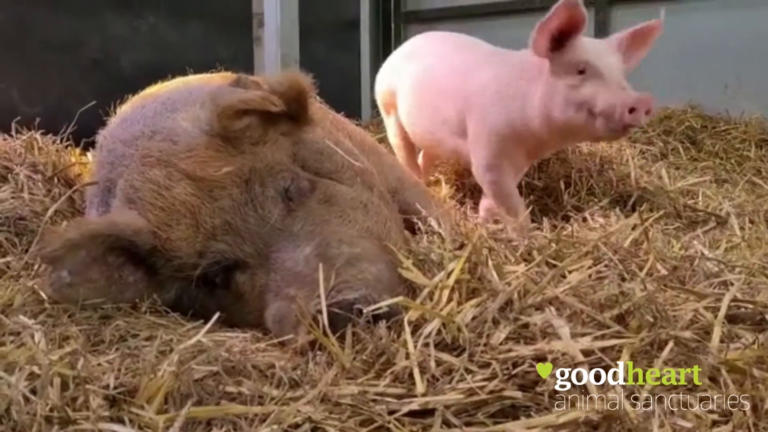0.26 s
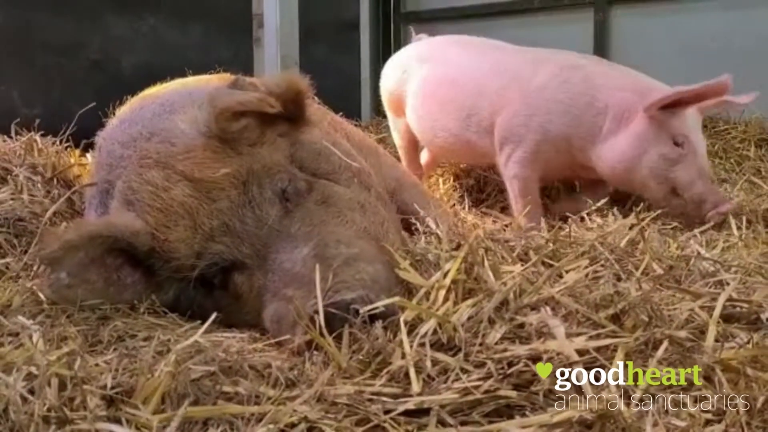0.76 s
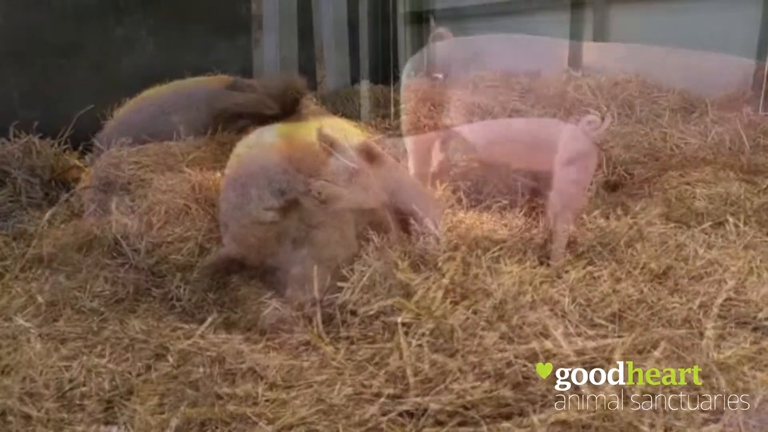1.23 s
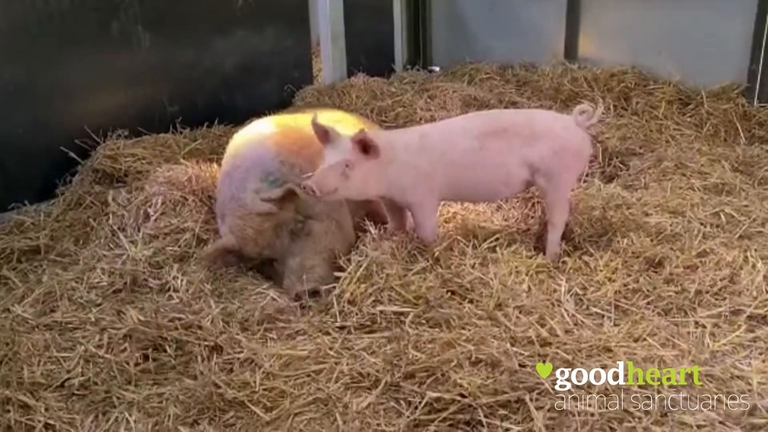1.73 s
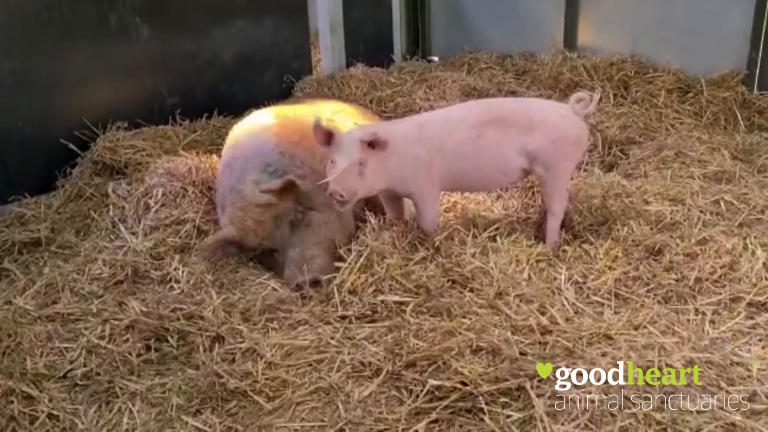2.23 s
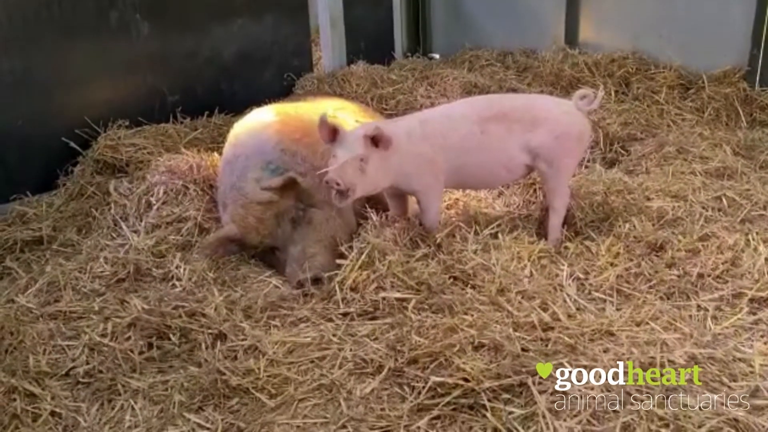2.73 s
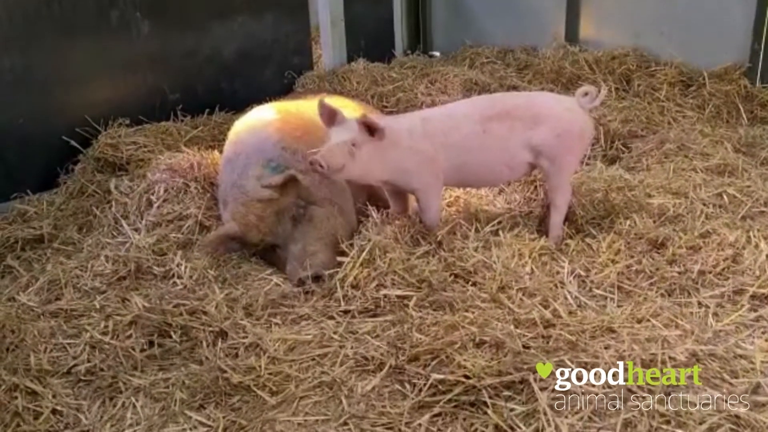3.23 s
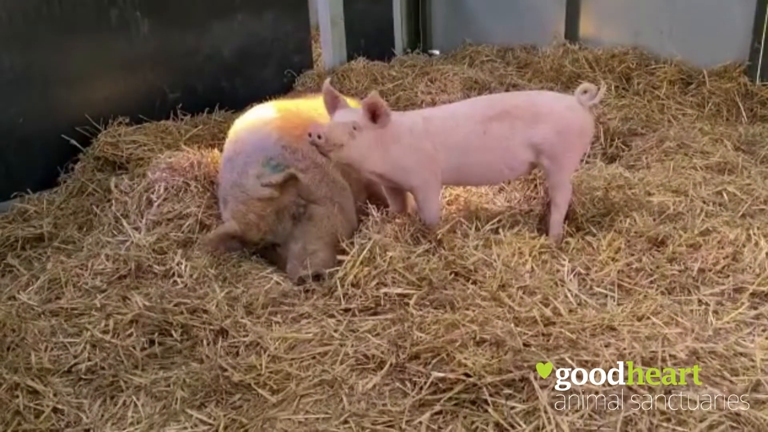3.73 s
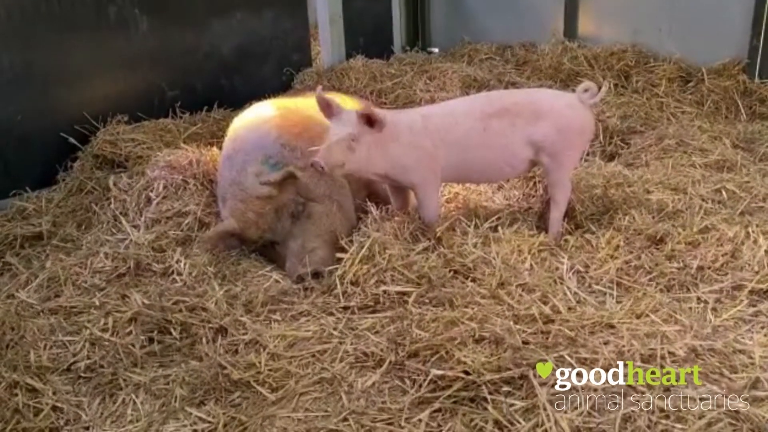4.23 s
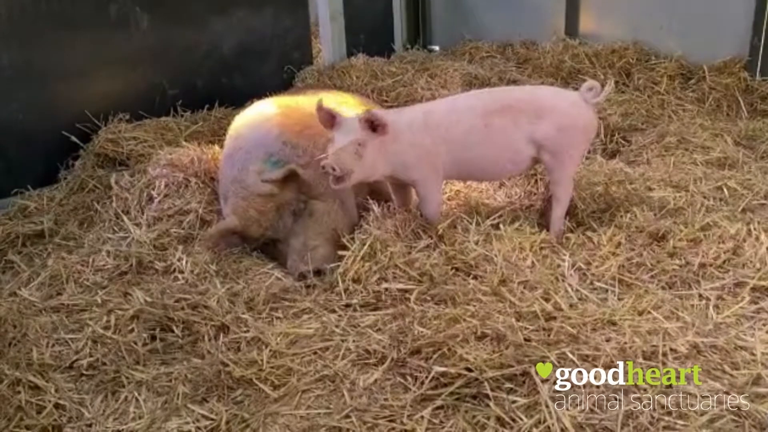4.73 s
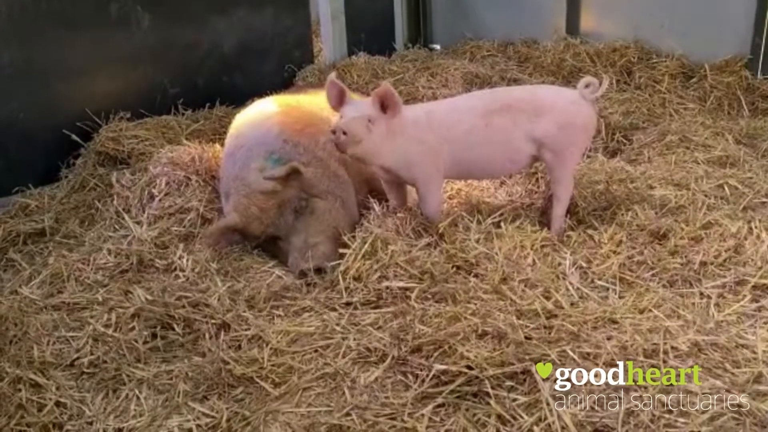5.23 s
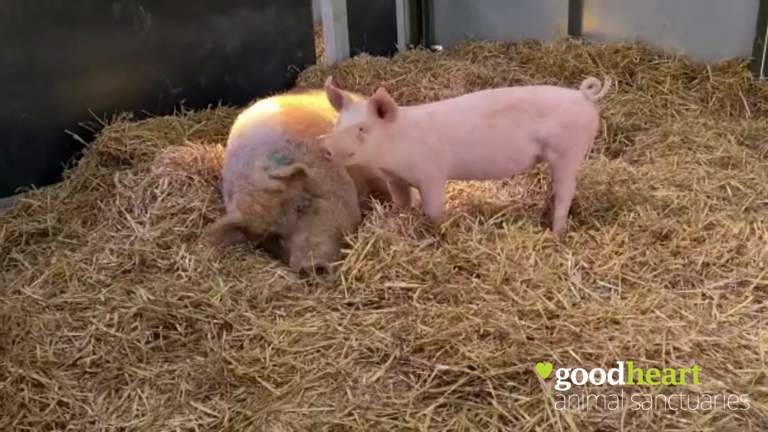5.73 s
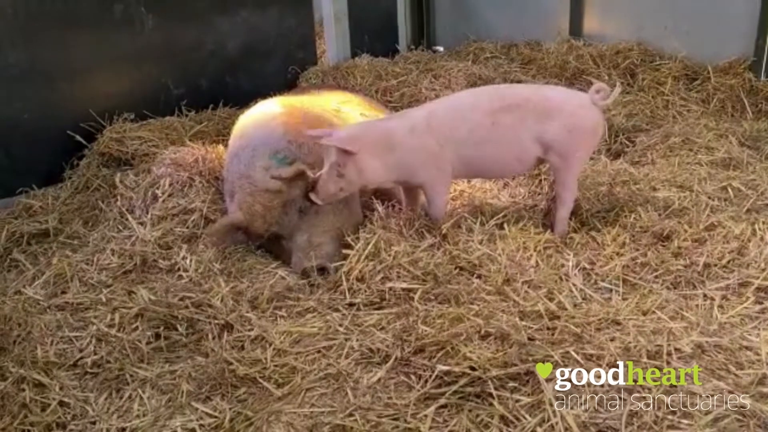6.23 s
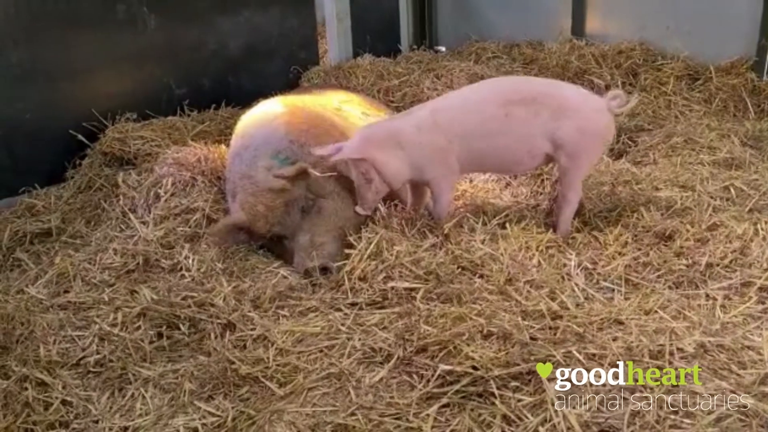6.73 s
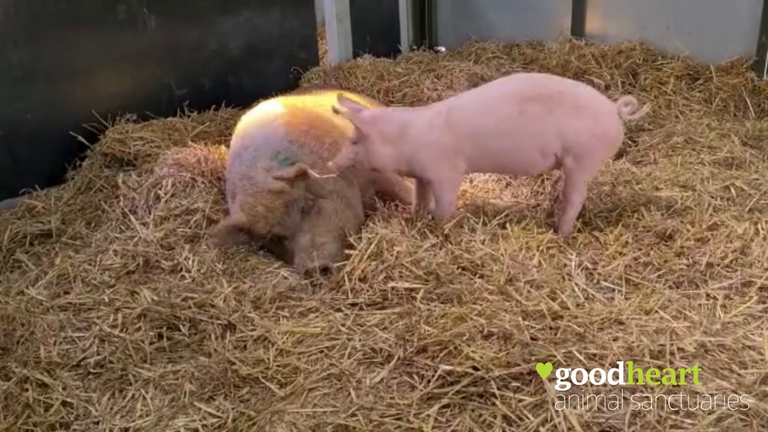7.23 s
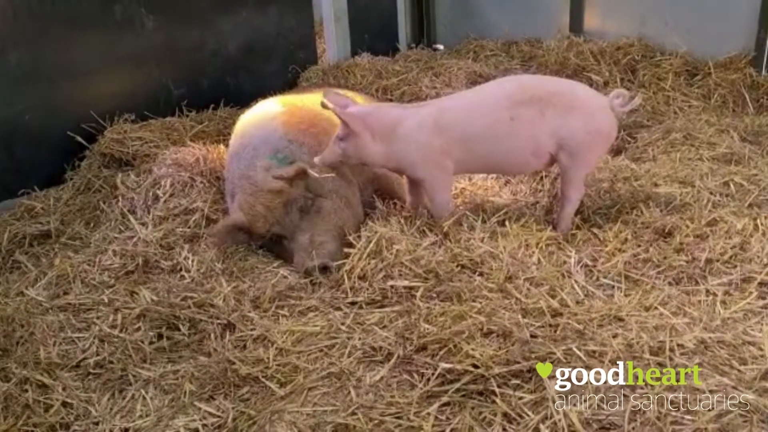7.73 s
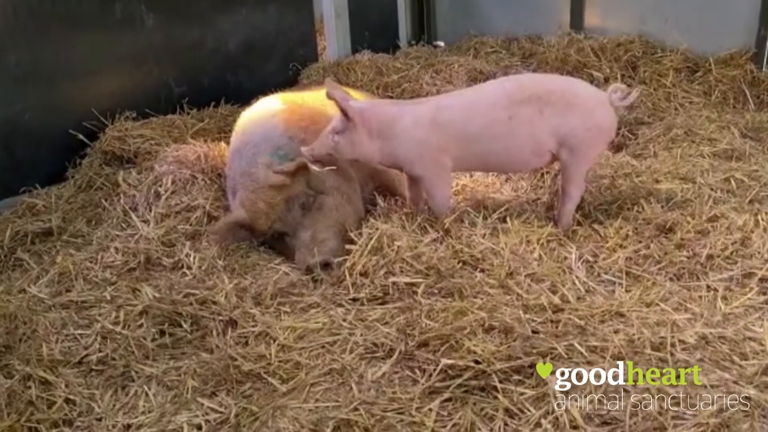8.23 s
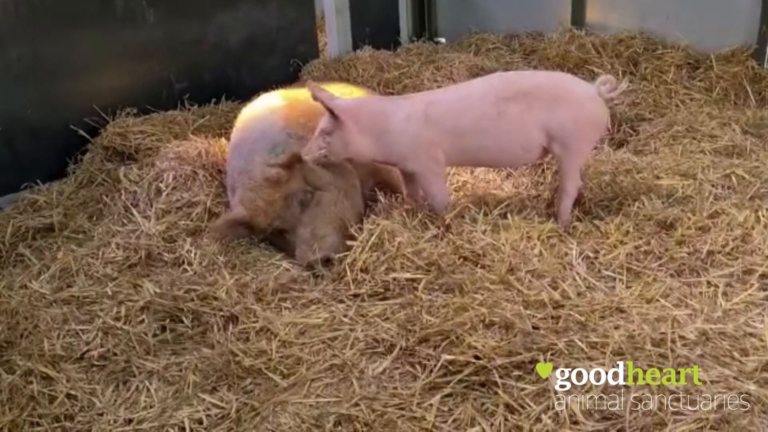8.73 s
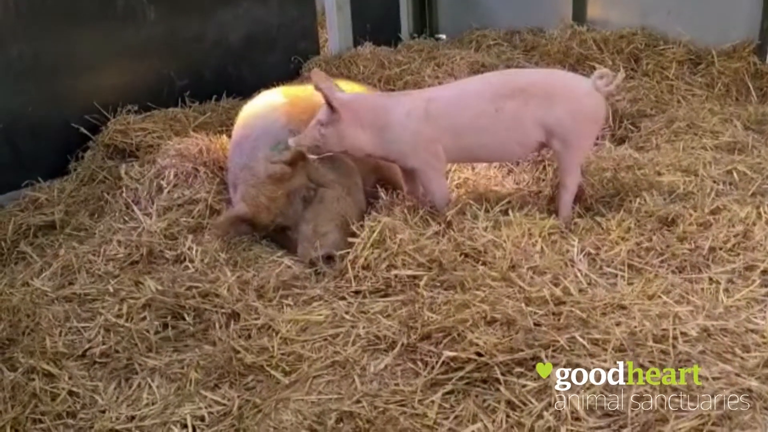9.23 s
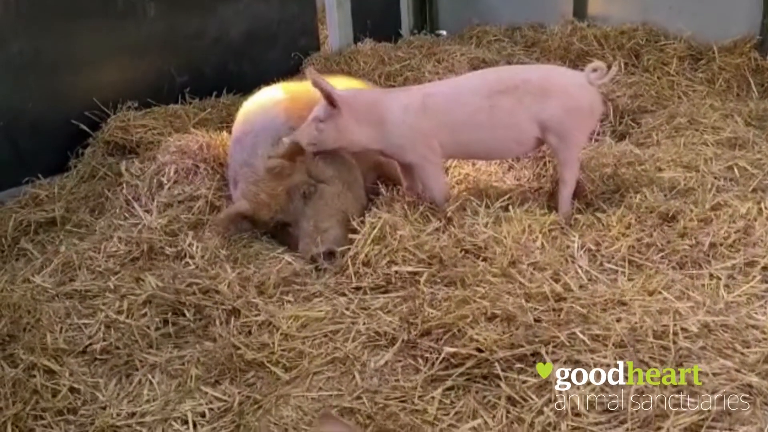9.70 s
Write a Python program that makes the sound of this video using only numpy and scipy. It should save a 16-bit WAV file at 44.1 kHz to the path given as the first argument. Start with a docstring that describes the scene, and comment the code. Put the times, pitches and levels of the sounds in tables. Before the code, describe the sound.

A piglet near the microphone roots in dry straw, its grunts made of a few slow, throaty pulses, with small sniffs and snapping stalks. Behind it a large dozing pig lets out low, raspy, nasal groans. A calmer spell is broken by a latch click and a sudden booming gate rattle, by far the loudest event. Afterwards groaning, grunting and rustling resume in the moderately reverberant barn, over a soft bass rumble.

```python
"""Barn air and rustling straw come first, then a big dozing pig's faint nasal whistle and low groans.
A piglet close by grunts in short rattles, sniffs and roots: slow vocal-fold flaps ring its airway.
The groans are a sine hum with rasp and whistle; the straw is filtered noise with tiny clicks.
Halfway through, a latch clicks and a gate bangs: its panel rings in decaying modes round the barn,
while noise bursts form its rattle."""
import sys
import numpy as np
from scipy import signal
from scipy.fft import rfft, irfft, next_fast_len
from scipy.io import wavfile

SR = 44100
rng = np.random.default_rng(int(sys.argv[2]) if len(sys.argv) > 2 else 0)


def wrap_up_sound(samples):
    """Save the sound to the file named by the first command line argument, as 16-bit audio."""
    columns = np.atleast_2d(samples).T
    # keep every value between -1 and 1, then stretch to whole-number steps
    tamed = np.clip(columns, -1, 1)
    steps = np.round(tamed * 32767).astype(np.int16)
    wavfile.write(sys.argv[1], SR, steps)


N = 439236
TIME = np.arange(N) / SR  # s

# spectrum of the barn air: (frequency [Hz], relative level [dB])
AIR_SPECTRUM = [(25, -21), (64, 9), (97, -3), (135, -4.5), (226, -8.5), (320, -7.5), (961, -23.5),
                (1610, -27.5), (2000, -25), (2600, -31.5), (4400, -120)]
AIR_DB = -51.5

# stirring of the straw, which sets its crisp sizzle: (time [s], level before trims [dB])
STRAW_STIR = [(0.0, -67), (0.47, -53), (0.7, -67), (1.3, -50.5), (1.41, -69), (1.5, -50.5), (1.68, -48),
              (2.0, -61.5), (2.28, -54), (2.55, -77.5), (3.2, -72.5), (3.5, -64.5), (4.2, -77), (6.18, -70),
              (6.45, -80), (7.42, -74), (7.65, -61), (7.95, -54), (8.12, -72), (8.75, -63), (9.15, -58.5),
              (9.42, -48), (9.55, -58), (9.75, -36), (9.96, -73)]
# shoves through the straw: (time [s], half width [s], level before trims [dB])
STRAW_SHOVES = [(0.887, 0.076, -51), (1.949, 0.021, -41.5), (7.526, 0.022, -53), (7.677, 0.057, -38.5),
                (8.46, 0.056, -49.5), (8.557, 0.049, -40.5), (8.844, 0.022, -51), (8.995, 0.037, -47),
                (9.265, 0.045, -35), (9.742, 0.024, -46)]
# spectra of sliding and of crisp stalks: (frequency [Hz], relative level [dB])
RUSTLE_SPECTRUM = [(700, -11.5), (1500, -5), (2300, -4), (3000, 1), (4500, 0.5), (6400, 4.5), (7400, -2.5),
                   (8500, -26), (11000, -16.5)]
SIZZLE_SPECTRUM = [(5000, -24), (7500, 0.5), (9000, -4.5), (10500, 2), (12200, 5.5), (14000, 2.5),
                   (16000, 2.5)]
# the softer rustle grows more slowly than the sizzle: levels at rest, and dB of rustle per dB of sizzle
REST_SIZZLE_DB, REST_RUSTLE_DB, RUSTLE_GROWTH = -72.5, -62, 0.38

# groans of the big pig: (time [s], length [s], time to the fullest point [s], settled pitch [Hz],
#   hum level [dB], rasp level [dB], nasal whistle level [dB], final slump [0-1])
GROANS = [(0.286, 1.21, 0.13, 112.2, -89, -88, -64, 0.02),
          (1.253, .77, 0.36, 105.3, -45.5, -47.5, -58.5, 0.01),
          (5.379, 1.113, 0.42, 95.55, -47, -52, -54.5, 0.99),
          (6.84, 0.865, 0.34, 103.4, -49.5, -47.5, -56, 0.03)]
# spectrum of the groan's rasp: (frequency [Hz], relative level [dB])
RASP_SPECTRUM = [(110, 10), (190, 5.5), (290, 5.5), (450, -2.5), (650, -8.5), (1000, -36), (2000, -63)]
# each groan starts at one pitch and sags; it swells to its fullest point and eases off
GROAN_START_HZ, SAG_S = 115.3, 0.38
GROAN_ATTACK_S, GROAN_RELEASE_S = 0.053, 0.075
# levels at both ends relative to the fullest point; the whistle follows with this share of them
SWELL_DB, EASE_DB, WHISTLE_SHARE = -14.5, -3.5, 0.88
# a slump is a last push of air, then slack folds and a falling pitch (times before the groan's end)
PUSH_BEFORE_S, PUSH_WIDTH_S, PUSH_DB = 0.23, 0.083, 9
SLACK_BEFORE_S, SLACK_S, SLACK_HZ = 0.14, 0.087, 30.94
SLACK_WHISTLE_DB = -32  # the whistle fades as the folds go slack

# piglet grunts: (time [s], number of flaps [count], flap rate [Hz], fullest moment [flaps],
#   swell [dB/flap], fade [dB/flap], brightening [dB/flap per factor e above the throat resonance],
#   extra level of every second flap [dB], leak relative to voice [dB], belly level [dB],
#   chest level [dB], throat level [dB], jaw level [dB], mouth level [dB], nose level [dB],
#   mouth frequency [Hz], mouth glide [octaves/flap])
GRUNTS = [(0.848, 5, 39.28, 1.5, 7, 4, 1.5, 1, -4, -42, -38, -48, -61, -58, -66, 1730, -0.062),
          (1.139, 2, 40, 1.5, 0, -2, -6, 0.5, -2, -46, -45.5, -54, -52, -55, -53.5, 1550, 0),
          (1.186, 3, 46.1, 2, -0.5, 0, -1.5, 2, -4, -40.5, -43.5, -48.5, -46.5, -37.5, -50.5, 1810, -0.035),
          (1.608, 3, 39.04, -0.5, 20.5, -0.5, -1, 1.5, -5.5, -44, -37.5, -37, -41.5, -40.5, -35, 1836, 0),
          (6.26, 1, 47.3, 12, 0, 0, 0, 0, -3, -40, -43, -45.5, -57, -63, -46.5, 1440, 0),
          (6.463, 2, 49.1, 1, 1, 0, 2, 0, -3, -46, -40.5, -46.5, -75, -72, -57, 1400, 0),
          (6.502, 5, 51.27, 1, -2.5, -1.3, -1.15, 3.5, -4.5, -52, -35.5, -37.5, -54, -47, -38.5, 1460, -0.014),
          (7.621, 3, 40.5, 2, 3, 0, 0.5, -0.5, -5.5, -35.5, -34.5, -43, -39.5, -40.5, -44, 1720, 0.019),
          (7.777, 6, 43, 0.5, 3, -1, 0.5, -2, -1.5, -50, -48.5, -45, -80, -75, -55.5, 1300, .03),
          (8.956, 5, 40.28, 4, 1, 11, -0.7, 1, -6, -38, -33, -37, -37.5, -43, -45.5, 1840, -0.0056),
          (9.564, 5, 49.86, 3.5, 5.5, 6, 4.5, 0, -0.5, -45.5, -43.5, -56, -81, -87, -82, 1300, 0)]
# fixed resonances of the piglet's airway: (frequency [Hz], width [Hz], relative level [dB])
BELLY = [(82, 50, 0)]
CHEST = [(205, 85, 0), (265, 100, -1.5)]
THROAT = [(384, 310, 0)]
JAW = [(1198, 360, -0.44), (590, 173, -0.057)]
NOSE = [(2763, 273, -3.5), (3860, 720, -19), (5400, 600, -19)]
# the mouth's upper resonance: frequency over that of the first, width, relative level
OVERTONE_RATIO, OVERTONE_WIDTH_HZ, OVERTONE_DB = 2.22, 680, -6

# the piglet's sniffs: (time of the fullest point [s], length [s], rush of air level [dB],
#   nostril ring level [dB], nostril frequency [Hz], nostril width [Hz], nostril glide [octaves/s])
SNIFFS = [(0.951, 0.09, -62, -54, 1484, 200, -0.23), (2.336, 0.18, -53, -57.5, 698, 350, 0),
          (3.411, 0.22, -54, -62.5, 750, 497, 1.34), (4.258, 0.036, -52, -55, 2700, 890, 2),
          (6.603, 0.052, -55, -52, 3790, 394, 1.1), (8.974, 0.055, -44, -49, 2950, 600, -2.04)]
# spectrum of the rushing air: (frequency [Hz], relative level [dB])
SNIFF_SPECTRUM = [(250, -2), (450, 4.5), (800, -4), (1300, 1.5), (2000, -3.5), (3000, -1), (5000, 0),
                  (8000, -20)]

# breaking stalks: (time [s], level before decay [dB])
SNAPS = [(0.997, -46), (1.321, -48.5), (1.62, -38), (1.675, -39), (1.764, -34.5), (3.661, -39.5),
         (7.552, -43), (9.089, -40), (9.463, -39.5), (9.721, -40)]

# small hollow knocks: (time [s], starting level [dB], settled frequency [Hz], 60 dB decay time [s])
KNOCKS = [(1.37, -32, 618, 0.067), (2.181, -37, 624, 0.095), (3.953, -26, 1800, 0.0061)]

# clicks of the gate's latch: (time [s], level [dB])
LATCH_CLICKS = [(4.577, -46), (4.5845, -60), (4.591, -60), (4.598, -50)]
# the latch's resonances: (frequency [Hz], width [Hz], relative level [dB])
LATCH_MODES = [(785, 160, -8), (1330, 110, -5.5), (2500, 380, -8.5), (3960, 300, -16.5)]

# blows on the gate: (time [s], rattle decay [s], ring level before the boom trim [dB],
#   hardness as tilt of the ring [dB/octave], body level [dB], clang level [dB], clank level [dB])
BLOWS = [(4.7152, 0.0055, -25.5, 0, -28.5, -10, -54.5), (4.767, 0.0085, -23, 2.5, -18, -10.5, -20),
         (4.785, 0.021, -33, -3, -18.5, -30, -28), (4.866, 0.015, -20, -0.5, -36, -18, -30.5),
         (4.882, 0.013, -25, -0.5, -18, -20.5, -39)]
# modes of the gate's panel: (frequency [Hz], relative level [dB], 60 dB decay time [s])
PANEL_MODES = [(41.6, 0, 0.43), (63, 5, 0.42), (98.9, 1.5, 0.53), (187.7, 0.5, 0.31), (362, -8, 0.36),
               (466, -18, 0.55), (575, -12, 0.46), (729, -13, 0.5), (1027, -10, 0.15), (1290, -12, .35),
               (1990, -15.5, .38), (3400, -26, .55)]
# spectra of its loose parts: (frequency [Hz], relative level [dB])
BODY_SPECTRUM = [(40, -8.5), (90, -5.5), (185, 15.5), (260, -8.5), (450, 3), (800, 0), (2000, -101)]
CLANG_SPECTRUM = [(100, 8), (250, 8), (500, 11.5), (800, 15.5), (1250, 15), (1600, 6.5), (2100, -11),
                  (2800, -25), (6000, -67)]
CLANK_SPECTRUM = [(1200, -18.5), (2050, 5.5), (2500, -1.5), (3100, -2.5), (3500, -5.5), (4100, -14),
                  (5100, -18), (6900, -25), (8500, -54.5)]
# wobbles of the loose sheet: (time [s], half width [s], frequency [Hz], level [dB])
WOBBLES = [(4.74, .02, 75, -28), (4.795, .012, 75, -17), (4.829, .02, 68, -18), (4.882, .028, 56, -19.5),
           (5.005, .052, 58, -22)]

BARN_T60_S, BARN_TREBLE_T60_S = 0.91, 0.74
# microphone pair, side signal: (frequency [Hz], gain [dB])
WIDTH_CURVE = [(60, -14.5), (250, -15.5), (450, -8.5), (800, -0.5), (3000, 2), (6000, -4), (9000, -8.5),
               (14000, -9)]
# microphone pair, left minus right: (frequency [Hz], difference [dB])
BALANCE_CURVE = [(60, 2.5), (500, 3.5), (1100, 4), (2200, -6.5), (5500, -4.5), (12000, -3.5)]
PORT_LAG, PIGLET_LAG = 20, 4  # delays between the ports for gate and piglet (samples)
CEILING = 0.96  # level towards which peaks are rounded (share of full scale)
TOP_HZ = 15950


def undb(db):
    """Amplitude is ten to the power of the level over 20 dB."""
    return 10 ** (np.asarray(db) / 20)


def unit(x):
    """Normalize to a root-mean-square amplitude of 1."""
    return x / np.sqrt(np.mean(x ** 2) + 1e-20)


def add(out, x, s):
    """Superpose x on out from time s."""
    i = max(int(s * SR), 0)
    out[..., i:i + x.shape[-1]] += x[..., :N - i]


def colour(x, points):
    """Linear filtering: multiply the spectrum by a curve through (Hz, dB) points on a log axis."""
    size = next_fast_len(x.shape[-1] + 2048)
    hz, db = np.transpose(points)
    bins_hz = np.arange(size // 2 + 1) * SR / size
    gain = undb(np.interp(np.log(bins_hz + 1), np.log(hz), db))
    return irfft(rfft(x, size) * gain, size)[..., :x.shape[-1]]


def resonate(x, modes):
    """Parallel damped resonators (Hz, width, dB) with steep skirts: each ring swells, then dies."""
    t = TIME[:SR // 12]
    ring = np.zeros(len(t))
    for hz, width, db in modes:
        envelope = (width * t) ** 2 * np.exp(-2 * np.pi * width * t)
        ring += undb(db) * width * envelope * np.sin(2 * np.pi * hz * t)
    return signal.fftconvolve(x, ring)[:len(x)]


def walk(rate):
    """Slow random modulation: straight lines join normal draws made rate times a second."""
    steps = rng.standard_normal(8192)
    return np.interp(TIME * rate, np.arange(len(steps)), steps)


def barn(x, wet_db, early_db=-12):
    """Room reverberation: direct sound, dense early echoes and a tail that loses its treble sooner."""
    t = TIME[:SR]
    noise = rng.standard_normal((2, SR))
    dull = signal.sosfilt(signal.butter(2, 2500, fs=SR, output="sos"), noise)
    tail = dull * undb(-60 * t / BARN_T60_S) + (noise - dull) * undb(-60 * t / BARN_TREBLE_T60_S)
    tail *= np.clip(t / 0.044, 0, 1)
    early = rng.standard_normal((2, SR)) * np.exp(-t / 0.033) * (t > 0.001)
    response = (undb(wet_db) * unit(tail) + undb(early_db) * unit(early)) / np.sqrt(SR)
    return x + signal.fftconvolve(x[None], response, axes=1)[:, :N]


def air():
    """Broadband room noise, weighted to the bass: a low, wavering rumble."""
    rumble = unit(colour(rng.standard_normal((2, N)), AIR_SPECTRUM))
    return rumble * undb(AIR_DB + 0.24 * walk(18.0) + walk(13.0))


def straw(stalks_per_s=800, crackle_db=-5.5, flicker_db=2.5, swish_rustle_db=-7, sizzle_trim_db=-1.0):
    """Friction noise: stalks slide in a hiss and snap in random tiny clicks; a shove makes them swish."""
    stir_db = np.interp(TIME, *np.transpose(STRAW_STIR))
    rustle_db = REST_RUSTLE_DB + RUSTLE_GROWTH * (stir_db - REST_SIZZLE_DB)
    shove = sum(undb(db) * np.exp(-((TIME - at) / width) ** 2) for at, width, db in STRAW_SHOVES)
    ticks = (rng.random(N) < stalks_per_s / SR).astype(float)
    # each click dies away over 0.4 ms
    ticks = signal.lfilter([1], [1, -np.exp(-1 / (0.0004 * SR))], ticks)
    hiss = rng.standard_normal((2, N))
    crackle = unit(ticks * rng.standard_normal((2, N)))
    grain = (hiss + undb(crackle_db) * crackle) * undb(flicker_db * walk(40))
    rustle_gain = undb(rustle_db) + undb(swish_rustle_db) * shove
    sizzle_gain = undb(stir_db + sizzle_trim_db) + shove
    rustle = rustle_gain * unit(colour(grain, RUSTLE_SPECTRUM))
    sizzle = sizzle_gain * unit(colour(grain, SIZZLE_SPECTRUM))
    return np.sqrt(2) * (rustle + sizzle)


def groan_controls():
    """Breath effort and fold tension set pitch and the strengths of hum, rasp and whistle."""
    hz, strengths = np.full(N, float(GROAN_START_HZ)), np.zeros((3, N))
    for s, length, fullest_s, settled_hz, hum_db, rasp_db, whistle_db, slump in GROANS:
        age = TIME[:int(length * SR)]
        left = length - age
        sag = (GROAN_START_HZ - settled_hz) * (1 - np.exp(-(age / SAG_S) ** 2))
        slack = np.clip(slump, 0, 1) * (1 + np.tanh((SLACK_BEFORE_S - left) / SLACK_S)) / 2
        add(hz, -sag - slack * SLACK_HZ, s)
        effort_db = np.interp(age, [0, fullest_s, length], [SWELL_DB, 0, EASE_DB])
        push_db = slump * PUSH_DB * np.exp(-((left - PUSH_BEFORE_S) / PUSH_WIDTH_S) ** 2)
        voice_db = effort_db + push_db
        snout_db = WHISTLE_SHARE * effort_db + slack * SLACK_WHISTLE_DB
        levels_db = [hum_db + voice_db, rasp_db + voice_db, whistle_db + snout_db]
        fade = np.minimum(np.minimum(age / GROAN_ATTACK_S, left / GROAN_RELEASE_S), 1) ** 2
        add(strengths, fade * undb(levels_db), s)
    return hz, *strengths


def big_pig(waver=0.012, rough=1.0, throb=0.34):
    """Periodic phonation: a sine hum, rasping fold pulses, and snout noise that throbs once a cycle."""
    hz, hum, rasp, whistle = groan_controls()
    cycles = np.cumsum(hz * (1 + waver * walk(70))) / SR
    pulses = np.diff(np.floor(cycles), prepend=0) * undb(2 * walk(82))
    flow = rng.standard_normal(N) * (1 + throb * np.cos(2 * np.pi * cycles))
    voice = rasp * unit(colour(unit(pulses) + rough * flow, RASP_SPECTRUM))
    snout = whistle * unit(resonate(flow, [(2840, 263, 0)]))
    pure_tone = np.sqrt(2) * np.sin(2 * np.pi * cycles)
    return hum * pure_tone + barn(voice + snout, wet_db=-5.5, early_db=-5)


def airway(modes, detune, rise_s=0.0018):
    """Impulse response of a damped cavity: each resonance (Hz, width, dB) swells and is soon spent."""
    t = TIME[:SR // 25]
    ring = np.zeros(len(t))
    for hz, width, db in modes:
        ring += undb(db) * width * np.exp(-(width * t) ** 2) * np.sin(2 * np.pi * hz * detune * t)
    return ring * (1 - np.exp(-(t / rise_s) ** 2))


def piglet(scatter_db=1.5, wander=0.02, puff_db=-13, puff_s=0.0017, mouth_width_hz=250, lowest_hz=55):
    """Source and filter: slow fold flaps, each with a puff of air, ring the airway a little differently."""
    out, t = np.zeros(N), TIME[:SR // 3]
    puff_t = TIME[:SR // 50]
    for grunt in GRUNTS:
        s, count, rate_hz, fullest, swell_db, fade_db, bright_db, limp_db, leak_db = grunt[:9]
        *levels, mouth_hz, glide = grunt[9:]
        flap = np.arange(round(count))
        length = len(flap) / rate_hz
        mouth = [(mouth_hz, mouth_width_hz, 0),
                 (OVERTONE_RATIO * mouth_hz, OVERTONE_WIDTH_HZ, OVERTONE_DB)]
        late = flap - fullest
        pressure_db = swell_db * np.minimum(late, 0) - fade_db * np.maximum(late, 0)
        for modes, db in zip((BELLY, CHEST, THROAT, JAW, mouth, NOSE), levels):
            # alternation of the flaps grows with resonance frequency; only the mouth changes shape
            height = np.log(modes[0][0] / THROAT[0][0])
            shape_db = pressure_db + bright_db * height * flap + limp_db * (flap % 2) * (1 + height)
            tuning = 2 ** (glide * flap * (modes is mouth))
            voice = np.zeros(len(t))
            for k, (size, shift) in zip(flap, rng.standard_normal((len(flap), 2))):
                puff = rng.standard_normal(len(puff_t)) * np.exp(-puff_t / puff_s)
                drive = undb(puff_db) * puff / np.linalg.norm(puff)
                drive[0] += 1  # the flap itself is an impulse
                ring = signal.fftconvolve(drive, airway(modes, tuning[k] * (1 + wander * shift)))
                add(voice, undb(shape_db[k] + scatter_db * size) * ring, k / rate_hz)
            # air leaks between the flaps; much of it turns a rattle into a soft murmur
            flow = undb(np.interp(t * rate_hz, flap, shape_db)) * (t < length)
            hiss = rng.standard_normal(len(t)) * flow
            leak = signal.fftconvolve(hiss, airway(modes, 0.93))[:len(t)]
            blend = unit(unit(voice) + undb(leak_db) * unit(leak))
            # the level refers to the grunt's own length
            add(out, undb(db) * blend * np.sqrt(length / t[-1]), s)
    # nothing below the belly's ring passes
    out = signal.sosfilt(signal.butter(4, lowest_hz, "highpass", fs=SR, output="sos"), out)
    # the piglet is close and a little to the right
    near = barn(out, wet_db=-14, early_db=-10)
    return np.array([np.roll(near[0], shift=PIGLET_LAG), near[1]])


def sniffs():
    """Turbulent flow: swells of air noise with a nostril resonance that slides as the snout flexes."""
    out, t = np.zeros((2, N)), TIME[:SR] - TIME[:SR].mean()
    for s, length, rush_db, ring_db, hz, width_hz, glide in SNIFFS:
        rush = colour(rng.standard_normal((2, SR)), SNIFF_SPECTRUM)
        # slow noise on a carrier makes a noise band around it
        lowpass = signal.butter(2, width_hz / 2, fs=SR, output="sos")
        flutter = signal.sosfilt(lowpass, rng.standard_normal((2, 2, SR)))
        phase = 2 * np.pi * np.cumsum(hz * 2 ** (glide * np.clip(t, -length, length))) / SR
        nostril = flutter[0] * np.cos(phase) + flutter[1] * np.sin(phase)
        swell = np.exp(-2 * (t / length) ** 2)
        add(out, swell * (undb(rush_db) * unit(rush) + undb(ring_db) * unit(nostril)), s + t[0])
    return out * undb(1.8 * walk(55))


def snaps(decay_s=0.0066):
    """Brittle fracture: stalks breaking under a trotter give sudden, decaying noise bursts."""
    out, t = np.zeros(N), TIME[:SR // 20]
    for s, db in SNAPS:
        noise = rng.standard_normal(len(t))
        crack = unit(colour(noise, RUSTLE_SPECTRUM) + 0.5 * colour(noise, SIZZLE_SPECTRUM))
        add(out, undb(db) * np.exp(-t / decay_s) * crack, s)
    return barn(out, wet_db=1.0)


def knocks():
    """Free decay of a single mode: small hollow knocks, each one ring that sags in pitch."""
    out, t = np.zeros(N), TIME[:SR // 4]
    for s, db, hz, t60 in KNOCKS:
        ring = np.sin(2 * np.pi * np.cumsum(hz * (1 + 0.066 * np.exp(-t / 0.019))) / SR)
        add(out, undb(db - 60 * t / t60) * ring * (1 - np.exp(-t / 0.00089)), s)
    return barn(out, wet_db=-4, early_db=-9)


def latch(scrape_s=0.00045):
    """Friction exciting resonances: the bolt jerks free, each brief scrape ringing as a dry click."""
    out, t = np.zeros(N), TIME[:SR // 4]
    for s, db in LATCH_CLICKS:
        scrape = rng.standard_normal(len(t)) * t * np.exp(-t / scrape_s)
        add(out, undb(db) * unit(resonate(scrape, LATCH_MODES)), s)
    near = barn(out, wet_db=-8, early_db=-5)
    return np.array([near[0], np.roll(near[1], shift=PORT_LAG)])


def gate(rise_s=0.0016, push_s=0.00024, chatter_db=4.0, boom_trim_db=-4.0):
    """Modal vibration: each blow rings the panel and makes loose parts chatter; the sheet wobbles on."""
    rattle, boom, t = np.zeros(N), np.zeros(N), TIME[:SR]
    for s, decay_s, ring_db, hard_db, *levels in BLOWS:
        ring = np.zeros(len(t))
        for hz, db, t60 in PANEL_MODES:
            tilt_db = hard_db * np.log2(hz / PANEL_MODES[0][0])
            ring += undb(db + tilt_db - 60 * t / t60) * np.sin(2 * np.pi * hz * t)
        add(boom, undb(ring_db) * ring * (1 - np.exp(-t / push_s)), s)
        chatter = undb(chatter_db * walk(356)[:SR])
        shake = (1 - np.exp(-t / rise_s)) * np.exp(-(t / (2 * decay_s)) ** 2) * chatter
        for points, db in zip((BODY_SPECTRUM, CLANG_SPECTRUM, CLANK_SPECTRUM), levels):
            add(rattle, undb(db) * shake * unit(colour(rng.standard_normal(SR), points)), s)
    wobble = np.zeros(N)
    for at, width, hz, db in WOBBLES:
        age = TIME - at
        wobble += undb(db) * np.exp(-(age / width) ** 2) * np.sin(2 * np.pi * hz * age)
    # the gate stands to one side, so its clatter reaches the right port later
    near = barn(rattle, wet_db=-12.5, early_db=-6.5)
    clatter = np.array([near[0], np.roll(near[1], shift=PORT_LAG)])
    return clatter + undb(boom_trim_db) * barn(boom, wet_db=-11.5, early_db=-12) + wobble


def scene():
    """Superposition of the barn air, the bedding, both pigs and the gate."""
    return air() + straw() + big_pig() + piglet() + sniffs() + snaps() + knocks() + latch() + gate()


def record(dry):
    """Stereo reception: two close ports hear the bass nearly alike, each with its own colour."""
    mid, side = (dry[0] + dry[1]) / 2, colour((dry[0] - dry[1]) / 2, WIDTH_CURVE)
    ports = []
    for sign in (1, -1):  # left, right
        balance = [(hz, sign * db / 2) for hz, db in BALANCE_CURVE]
        ports.append(colour(mid + sign * side, balance))
    # the small ports cannot pass the deepest bass
    ports = signal.sosfilt(signal.butter(4, 36, "highpass", fs=SR, output="sos"), ports)
    # the loudest peaks are rounded off
    ports = ports / (1 + (ports / CEILING) ** 4) ** (1 / 4)
    # the top is cut steeply
    return signal.sosfilt(signal.ellip(10, 0.2, 70, TOP_HZ, fs=SR, output="sos"), ports)


dry = scene()
out = record(dry)
wrap_up_sound(out)
```